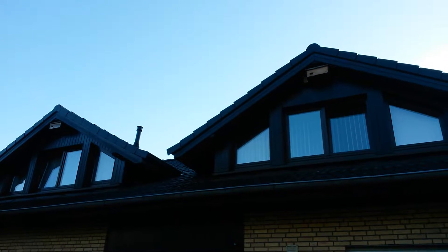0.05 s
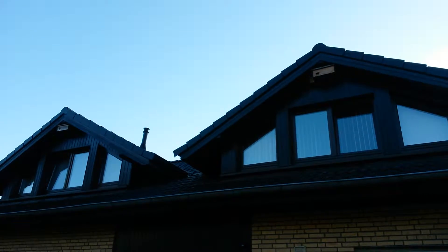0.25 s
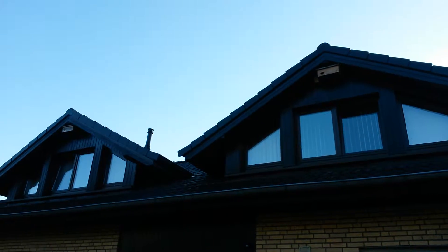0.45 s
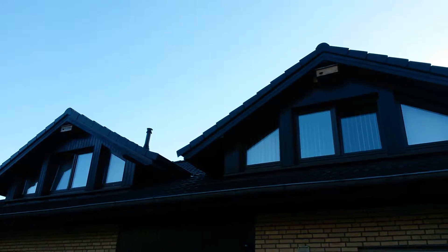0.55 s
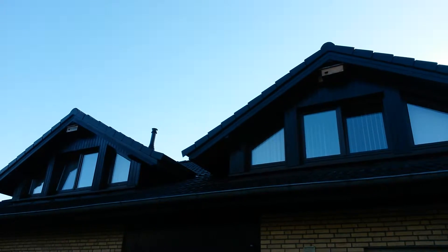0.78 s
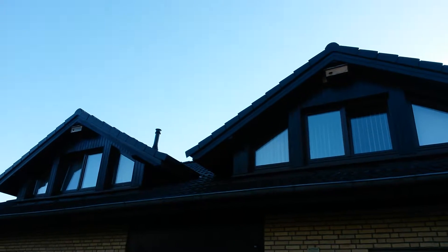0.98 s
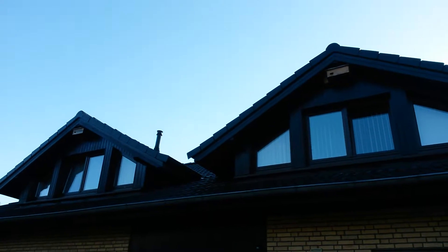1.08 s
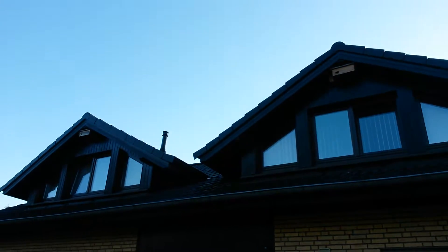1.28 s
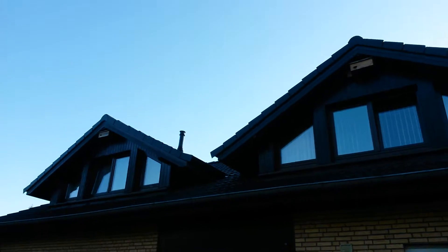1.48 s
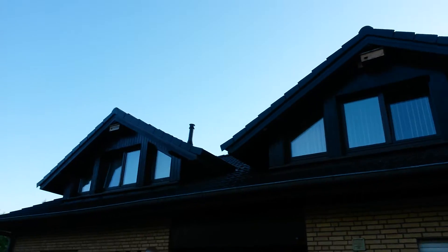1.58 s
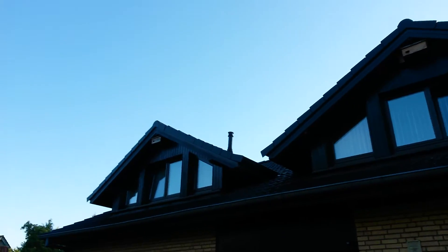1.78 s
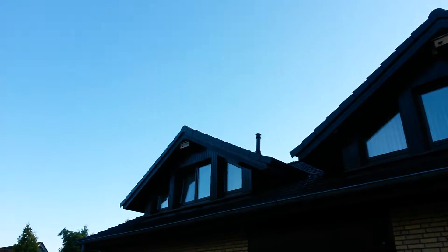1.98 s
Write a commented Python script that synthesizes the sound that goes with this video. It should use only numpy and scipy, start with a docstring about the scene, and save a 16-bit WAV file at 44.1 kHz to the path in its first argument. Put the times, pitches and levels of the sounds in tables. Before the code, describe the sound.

Outdoors among rooftops, swifts give a run of high, raspy screams and trills that echo off house walls, right of the stereo microphones. Behind them are farther swifts, small chirps and low traffic hum, with two soft camera bumps near the end.

```python
"""A low hum of far traffic and a few small birds chirping, then swifts screaming close over the rooftops.
Each scream is an arch of pitch chopped into a fast buzz that grows raspy and breaks into a slower trill.
The swifts wheel to the right of the stereo microphones, and the house walls throw their screams back.
More swifts call farther off. Late on, a finger bumps twice against the camera that holds the microphones."""
import sys
import numpy as np
from scipy import signal
from scipy.fft import rfft, irfft, next_fast_len
from scipy.io import wavfile
from scipy.ndimage import map_coordinates

SR = 44100
rng = np.random.default_rng(int(sys.argv[2]) if len(sys.argv) > 2 else 0)


def unload_wav(signal):
    """Save mono or channel-first audio to the path in sys.argv[1] as 16-bit WAV at rate SR, clipped to [-1, 1]."""
    wavfile.write(
        sys.argv[1],
        SR,
        np.round(np.clip(np.atleast_2d(signal).T, -1, 1) * 32767).astype(np.int16),
    )


N = 90404

# Outdoor hiss and rumble: freq_hz, level_db
AIR_SPECTRUM = [(15, -62), (28, -17), (45, 3), (110, -3.5), (175, -3), (290, -9.5), (500, -10), (900, -16),
                (1590, -18.5), (2300, -16.5), (3830, -17), (5000, -20), (7500, -23), (10500, -25),
                (12000, -20.5), (14500, -35)]
# How alike that air is at the two microphones: freq_hz, correlation
MIC_LIKENESS = [(60, .55), (200, .5), (600, .3), (1500, .1), (8000, 0)]
# Far traffic: start_s, end_s, start_hz, end_hz, level_db
TRAFFIC_HUMS = [(-.1, 0.21, 97, 96, -58.5), (0, 0.693, 168.8, 163.6, -59.5),
                (0.602, 1.48, 121.2, 125.3, -58.5), (1.3, 1.58, 164.6, 165, -55.5)]
# Wavering bands of the background: centre_hz, level_db
SWELL_BANDS = [(215, -74.5), (335, -75.5), (490, -75), (590, -73), (690, -80.5)]
# Echo decay between the houses: freq_hz, t60_s
YARD_DECAY = [(3000, 1), (6000, 0.74), (12000, 0.14)]
# Loudness of the distant swifts: time_s, level_db
FAR_SWIFT_LEVELS = [(0, -52.5), (.15, -49.5), (.5, -49), (1.35, -39.5), (1.45, -53.5), (1.8, -39),
                    (1.87, -38), (1.93, -45), (2.0, -56), (2.05, -83)]
# Their colour from afar: freq_hz, level_db
FAR_SWIFT_SPECTRUM = [(4000, -42), (5400, -41.5), (5900, -11), (6250, -10), (6600, -20), (7200, -30.5),
                      (10000, -43)]
# Small birds: start_s, length_s, start_hz, middle_hz, end_hz, level_db
BIRD_CHIRPS = [(0.077, 0.0096, 3350, 3900, 4400, -50), (0.118, 0.03, 3750, 3410, 4600, -48.5),
               (0.14, 0.039, 4400, 3950, 3340, -41.5), (0.161, 0.068, 3550, 3530, 3215, -41),
               (0.608, 0.034, 3100, 4410, 4780, -44), (0.634, 0.03, 4600, 3550, 3065, -45),
               (0.659, 0.051, 3400, 3050, 2840, -49), (0.905, 0.058, 4300, 3760, 3440, -53.5),
               (0.968, 0.0436, 3700, 3330, 2910, -48), (1.753, 0.0266, 3300, 4210, 3900, -51),
               (1.786, 0.028, 3900, 3390, 3750, -41.5), (1.816, .016, 4000, 3360, 3350, -40),
               (1.832, 0.063, 3500, 3160, 3090, -49.5), (1.913, 0.012, 3400, 3600, 3200, -52)]
# Finger on the camera: start_s, level_db, relative_tick_db
FINGER_BUMPS = [(1.6097, -26.5, -8), (1.714, -33.5, -22)]
# Modes of its case: pitch_hz, level_db, t60_s
CASE_MODES = [(140, -9, 0.051), (356, -3, 0.0066), (664, 1.5, 0.0039), (1300, -7.5, 0.0026)]
# Contact tick: freq_hz, level_db
TICK_SPECTRUM = [(100, -16), (1500, 0), (3000, 2), (8000, -5), (14000, -12)]
# Course of each near scream: time_s, pitch_hz, level_db, relative_octave_db, relative_rasp_db
FIRST_SCREAM = [(0.187, 4780, -52.5, -9, -10), (0.205, 5496, -26, -19, -34), (0.221, 5810, -30.5, -16, -35),
                (0.249, 6075, -24, -19, -39), (0.269, 6250, -33, -11, -16), (0.311, 6326, -24, -16, -21),
                (0.319, 6290, -30.5, -9.5, -14), (0.391, 6460, -20, -18.5, -15),
                (0.477, 6315, -25, -16.5, -11), (0.517, 6275, -30, -17, -2.5)]
SECOND_SCREAM = [(0.594, 5175, -32.5, -11, -9), (0.61, 5637, -22.5, -27, -29),
                 (0.644, 6010, -19.5, -21, -46), (0.68, 6173, -19, -26, -47),
                 (0.688, 6068, -20, -24.5, -41), (0.696, 6160, -21.5, -21, -58),
                 (0.756, 6120, -25, -22.5, -34), (0.808, 5983, -25.5, -27, -16.5),
                 (0.935, 5888, -38.5, -28, -6)]
THIRD_SCREAM = [(0.969, 4808, -43, -8, -0.5), (0.985, 5336, -25, -11, -41), (1.009, 5830, -23, -12.5, -29),
                (1.021, 5800, -24, -14.5, -19), (1.049, 5978, -20.5, -16, -31),
                (1.143, 6235, -26, -10.5, -14.5), (1.153, 6203, -37, -11, -4), (1.159, 6150, -27, -10, -19),
                (1.224, 6310, -30.5, -20, -6)]
FOURTH_SCREAM = [(1.462, 4700, -54, -11, -10), (1.478, 5190, -40.5, -15, -24), (1.5, 5490, -35, -25, -27),
                 (1.54, 5666, -34, -24.5, -39), (1.564, 5858, -31, -29, -42),
                 (1.62, 5890, -34.5, -21.5, -19), (1.664, 5886, -38, -40, -24),
                 (1.715, 6040, -39, -32, -19)]
FIFTH_SCREAM = [(2.044, 4650, -51, -15, -18), (2.06, 5250, -22, -18, -41)]
SCREAMS = [FIRST_SCREAM, SECOND_SCREAM, THIRD_SCREAM, FOURTH_SCREAM, FIFTH_SCREAM]
# Voice of each scream: buzz_hz, sweep_hz, buzz_depth, relative_fifth_db, gain_db, left_minus_right_db
SCREAM_VOICES = [(280.6, 530, .8, -48, 1.5, -0.5), (276, 130, 0.51, -49, 0, 0),
                 (253.6, 920, 0.75, -33, 0.5, -1.5), (266, 850, 0.73, -32.5, 1.5, 2),
                 (269.7, 150, 0.86, -44, -1, -9)]
# Trills ending the first four screams:
# first_s, last_s, pip_count, first_hz, last_hz, first_db, last_db, relative_octave_db
END_TRILLS = [(.526, .590, 6, 5940, 5500, -24, -20.5, -5.5), (.949, 1.097, 7, 6110, 4650, -28, -48.5, -15),
              (1.231, 1.333, 9, 6010, 4676, -20, -33, -16.5),
              (1.728, 1.874, 7, 6285, 4850, -26, -41.5, -56)]
# Rasp in a swift's voice: freq_hz, level_db
RASP_SPECTRUM = [(2500, -85), (4500, -13), (6000, 4), (7000, 10.5), (8300, 2.5), (9300, -9), (10300, -6.5),
                 (12000, -4), (13500, -44), (15000, -26)]
# Reflections off the house walls: delay_s, level_db
WALL_ECHOES = [(.0014, -11.5), (.004, -12), (.012, -13.5), (.026, -12)]
# Colour of those reflections: freq_hz, gain_db
WALL_COLOUR = [(7000, 3.5), (12000, 3)]
# Balance of the near swifts at the microphones: freq_hz, left_minus_right_db
MIC_SHADE = [(3000, 23), (5500, -2), (6500, -5.5), (8000, -19), (10000, -9), (12000, -14.5), (15000, 6.5)]

SIDES = np.array([[.5], [-.5]])  # splits a left-minus-right value between the microphones
ATTACK_S, RELEASE_S, ROUGH_HZ = .012, .0092, 34  # edges and pitch roughness of a swift's call


def amp(db):
    """Decibels to gain."""
    return 10 ** (np.asarray(db) / 20)


def unit(x):
    """Scale to rms 1."""
    return x / np.sqrt(np.mean(x ** 2) + 1e-20)


def clock():
    """The time of each sample in seconds."""
    return np.arange(N) / SR


def along(points, hz):
    """Interpolate (freq_hz, value) points on a log frequency axis."""
    freqs, values = np.transpose(points)
    return np.interp(np.log(hz + 1), np.log(freqs + 1), values)


def curves(rows):
    """One value per sample for each column after the time."""
    times, *columns = np.transpose(rows)
    return [np.interp(clock(), times, column) for column in columns]


def wobble(rate):
    """A smooth random curve, rate knots a second."""
    return map_coordinates(rng.standard_normal(N), [clock() * rate], mode="wrap")


def gate(start, end, rise, fall):
    """An envelope from start to end, with sloping sides."""
    t = clock()
    return np.clip((t - start) / rise, 0, 1) * np.clip((end - t) / fall, 0, 1)


def filtered(x, response):
    """Shape x by a gain that depends on frequency."""
    size = next_fast_len(N + SR // 4)
    return irfft(rfft(x, size) * response(np.fft.rfftfreq(size, 1 / SR)), size)[..., :N]


def noise(spectrum):
    """Coloured noise of rms 1."""
    return unit(filtered(rng.standard_normal(N), lambda hz: amp(along(spectrum, hz))))


def phase_of(hz):
    """Phase in radians of a moving frequency."""
    return 2 * np.pi * np.cumsum(hz) / SR


def air_and_traffic():
    """Outdoor hiss and rumble, most alike at both microphones in the bass; far traffic hums come and go."""
    def mid_side_gains(hz):
        angle = np.arccos(along(MIC_LIKENESS, hz)) / 2
        return np.array([np.cos(angle), np.sin(angle)])

    mid, side = filtered(np.array([noise(AIR_SPECTRUM), noise(AIR_SPECTRUM)]), mid_side_gains)
    mics = amp(-55 + .44 * wobble(6)) * np.array([mid + side, mid - side])
    for start, end, start_hz, end_hz, db in TRAFFIC_HUMS:
        pitch = np.interp(clock(), [start, end], [start_hz, end_hz]) + 1.5 * wobble(4.2)
        envelope = amp(db + 1.2 * wobble(11)) * gate(start, end, rise=.09, fall=.09)
        mics += envelope * np.sqrt(2) * np.sin(phase_of(pitch) + [[0], [1.1]])  # right leads in phase
    return mics * amp([[1.2], [-1.2]])


def swells(relative_width=.039, depth_db=5.5):
    """The low background swells and fades in a few narrow bands, toward the left."""
    skirt = [(-3, -70), (-1, -8), (0, 0), (1, -8), (3, -70)]  # widths_from_centre, level_db
    x = np.zeros(N)
    for hz, db in SWELL_BANDS:
        band = [(hz * (1 + step * relative_width), skirt_db) for step, skirt_db in skirt]
        x += amp(db + depth_db * wobble(6.84)) * noise(band)
    return x * amp([[2], [-3]])


def far_swifts(pan_db=-7.5):
    """Distant screams on the right, smeared by echoes into a narrow band of noise."""
    level_db, = curves(FAR_SWIFT_LEVELS)
    envelope = amp(level_db + 1.8 * wobble(40.27) + pan_db * SIDES)
    return envelope * np.array([noise(FAR_SWIFT_SPECTRUM), noise(FAR_SWIFT_SPECTRUM)])


def yard_echo(x):
    """The diffuse echo between the houses; its treble dies first."""
    hz, t, spectra = signal.stft(rng.standard_normal((2, SR * 3 // 4)), SR, nperseg=256)
    decay = amp(-60 * t / along(YARD_DECAY, hz)[:, None])
    tail = signal.istft(spectra * decay, SR, nperseg=256)[1]
    return signal.fftconvolve(x[None], tail / np.linalg.norm(tail[0]), axes=1)[:, :N]


def small_birds(gain_db=-5, echo_db=-8, flicker_db=4, rough_hz=150):
    """Short gliding chirps some way off among the houses."""
    x = np.zeros(N)
    for start, length, *glide_hz, db in BIRD_CHIRPS:
        end = start + length
        pitch = np.interp(clock(), [start, start + length / 2, end], glide_hz)
        envelope = amp(db + flicker_db * wobble(350)) * gate(start, end, length / 4, length / 4)
        x += envelope * np.sqrt(2) * np.sin(phase_of(pitch + rough_hz * wobble(700)))
    return amp(gain_db) * (x + amp(echo_db) * yard_echo(x))


def camera_bumps(tick_t60_s=.005):
    """A finger knocks the case, louder at the left microphone: a tick and a few damped modes."""
    x = np.zeros(N)
    for start, db, tick_db in FINGER_BUMPS:
        age = np.maximum(clock() - start, 0)
        ring = sum(amp(mode_db - 60 * age / t60) * np.sin(2 * np.pi * hz * age)
                   for hz, mode_db, t60 in CASE_MODES)
        tick = amp(tick_db - 60 * age / tick_t60_s) * (age > 0) * noise(TICK_SPECTRUM)
        x += amp(db) * (ring + tick)
    return x * amp([[3], [-4]])


def with_walls(x, middle_s, drift_s_per_s=.0015):
    """Each microphone hears the bird directly and off the walls, with delays that drift as it flies."""
    t, mics = clock(), np.array([x, x])
    reflected = filtered(x, lambda hz: amp(along(WALL_COLOUR, hz)))
    for mic in mics:
        for delay, db in WALL_ECHOES:
            lag = delay * rng.uniform(.7, 1.3) + drift_s_per_s * rng.normal() * (t - middle_s)
            mic += amp(db) * map_coordinates(reflected, [(t - lag) * SR])
    return mics


def scream(rows, buzz_hz, sweep_hz, depth, fifth_db, slowing_hz_per_s=120, sweep_growth_s=.17):
    """A whistle in fast pulses, each an upward sweep; overtones and rasp ride on the pulses."""
    start, end = rows[0][0], rows[-1][0]
    age = clock() - start
    pitch, level_db, octave_db, rasp_db = curves(rows)
    pulse_hz = (buzz_hz - slowing_hz_per_s * age) * (1 + .035 * wobble(120))
    cycle = np.cumsum(pulse_hz) / SR % 1
    buzz = 1 - depth * np.cos(np.pi * cycle) ** 2
    sweep = sweep_hz * np.clip(age / sweep_growth_s, .3, 1) * (cycle - .5)
    phase = phase_of(pitch + sweep + 14 * wobble(150) + ROUGH_HZ * wobble(1800))
    whistle = unit(buzz * np.sin(phase))
    octave = amp(octave_db - 1.5) * unit(buzz ** 2 * np.sin(2 * phase))
    fifth = amp(fifth_db) * unit(buzz * np.sin(1.5 * phase))
    rasp = amp(rasp_db - 2) * unit(buzz * noise(RASP_SPECTRUM))
    edges = gate(start - ATTACK_S, end + RELEASE_S, ATTACK_S, RELEASE_S)
    return (whistle + octave + fifth + rasp) * amp(level_db + 1.1 * wobble(90)) * edges


def trill(first_s, last_s, count, first_hz, last_hz, first_db, last_db, octave_db, sweep_hz=-250):
    """Evenly spaced pips that sink ever faster in pitch; their level moves along the same curve."""
    age, length = clock() - first_s, last_s - first_s
    period = length / (count - 1)
    bend = np.clip(age / length, 0, 1) ** 3
    cycle = (age / period + .5) % 1 - .5
    pip = np.exp(-(cycle / np.where(cycle < 0, .083, .2)) ** 2)  # quick rise, slower fall
    pitch = first_hz + (last_hz - first_hz) * bend + sweep_hz * cycle
    phase = phase_of(pitch + 2 * ROUGH_HZ * wobble(1800))
    tone = np.sqrt(2) * (pip * np.sin(phase) + amp(octave_db) * pip ** 2 * np.sin(2 * phase))
    rasp = amp(-18.5) * np.sqrt(pip) * noise(RASP_SPECTRUM)
    edges = gate(first_s - period / 2, last_s + period / 2, ATTACK_S, ATTACK_S)
    return (tone + rasp) * amp(first_db + (last_db - first_db) * bend) * edges


def near_swifts(echo_db=-13, left_lag_s=.00003):
    """Swifts close by on the right: the left microphone hears them later and with less treble."""
    def shade_and_lag(hz):
        return amp(SIDES * along(MIC_SHADE, hz)) * np.exp(-2j * np.pi * hz * SIDES * left_lag_s)

    mics = np.zeros((2, N))
    for k, (rows, (*voice, gain_db, pan_db)) in enumerate(zip(SCREAMS, SCREAM_VOICES)):
        call = amp(gain_db) * scream(rows, *voice)
        if k < len(END_TRILLS):
            call += trill(*END_TRILLS[k])
        middle_s = (rows[0][0] + rows[-1][0]) / 2
        mics += amp(SIDES * pan_db) * (with_walls(call, middle_s) + amp(echo_db) * yard_echo(call))
    return filtered(mics, shade_and_lag)


def scene():
    """Birds near and far, background and handling noise, as they reach the two microphones."""
    return near_swifts() + far_swifts() + small_birds() + air_and_traffic() + swells() + camera_bumps()


def record(dry):
    """The camera keeps nothing above its band limit."""
    return filtered(dry, lambda hz: hz < 14900)


dry = scene()
out = record(dry)
unload_wav(out)
```